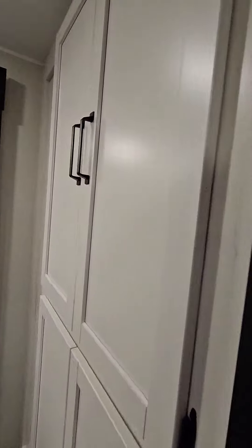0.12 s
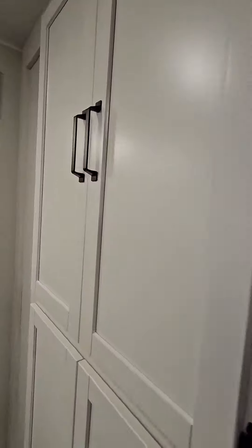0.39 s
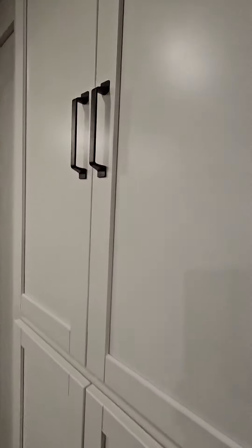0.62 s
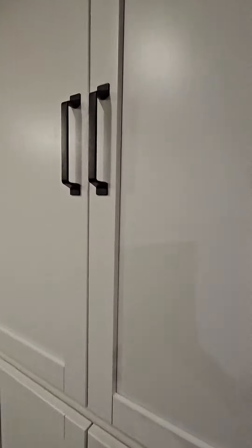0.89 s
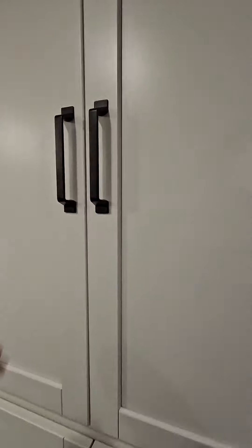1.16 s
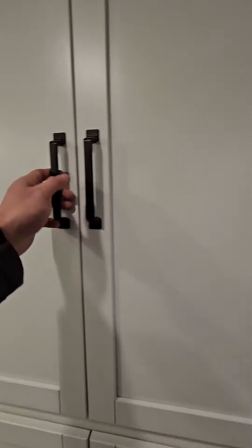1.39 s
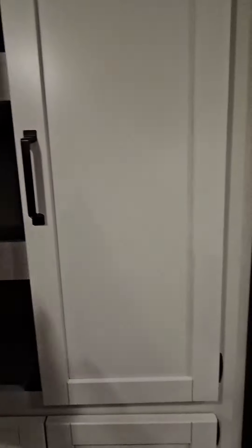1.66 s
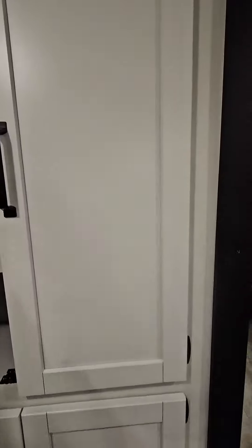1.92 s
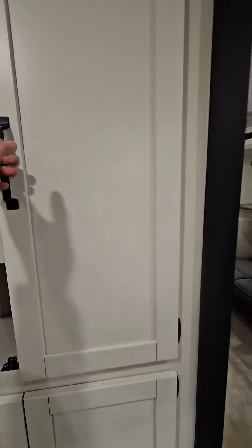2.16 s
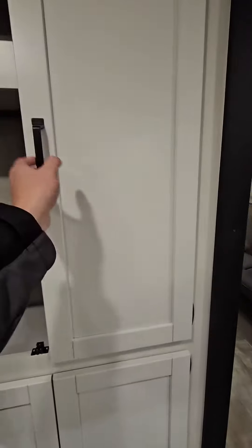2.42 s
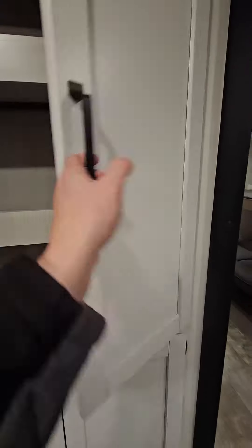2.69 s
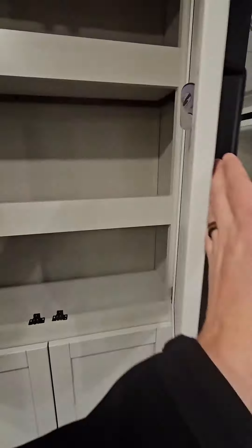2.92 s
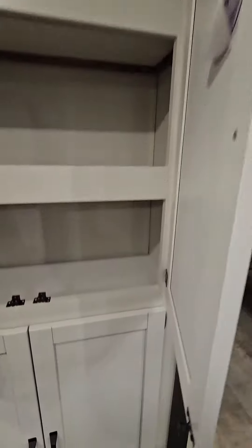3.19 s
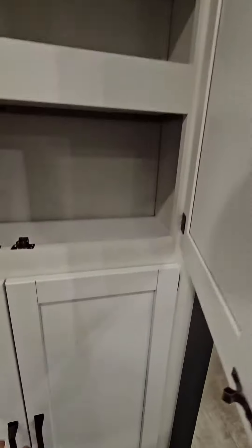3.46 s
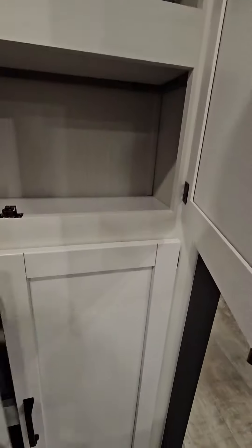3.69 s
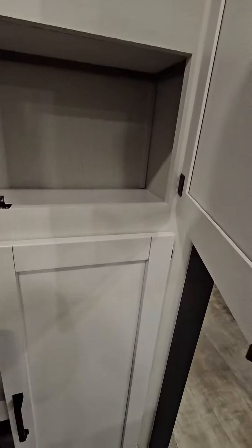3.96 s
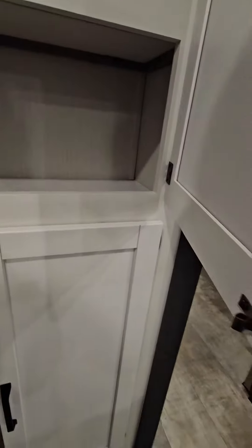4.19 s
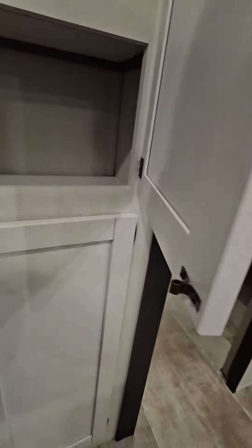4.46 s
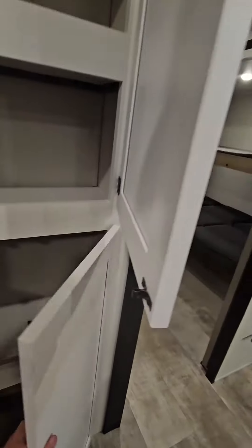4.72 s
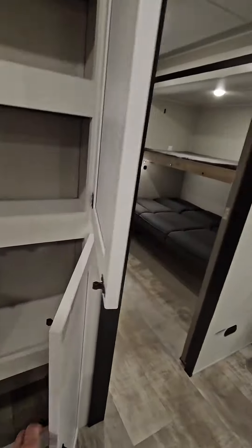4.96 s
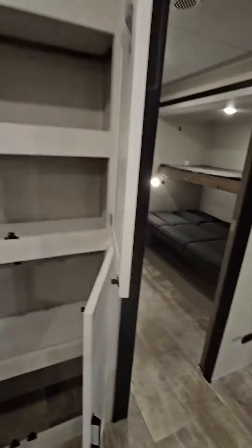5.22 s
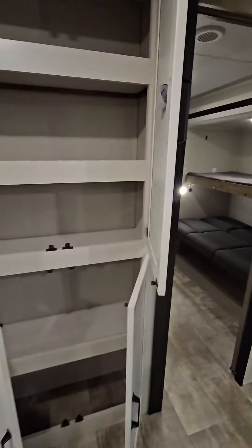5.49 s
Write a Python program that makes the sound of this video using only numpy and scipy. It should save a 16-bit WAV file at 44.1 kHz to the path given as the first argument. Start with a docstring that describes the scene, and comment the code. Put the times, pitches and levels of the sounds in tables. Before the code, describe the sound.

Cupboard doors are yanked off stiff catches one after another in a small trailer, with sharp wooden clacks, deep knocks, rattling hinges and sleeve rustle.

```python
"""Cupboard doors pulled open in a trailer

Four light wooden doors are pulled off spring catches: filtered noise clacks, decaying sines ring the steel.
Door wood knocks and booms through resonances; hinges flap in runs of roughly 22 taps a second, and buzz.
Padded thumps and dull thuds are low decaying tones; a tick, narrow tones, a panel's hum and scuffs join in.
A sleeve rustles as flickering noise over steady room air; short noise tails give the small room."""
import sys
import numpy as np
from scipy import signal
from scipy.fft import rfft, irfft, next_fast_len
from scipy.io import wavfile
from scipy.ndimage import uniform_filter1d, map_coordinates

SR = 44100
rng = np.random.default_rng(int(sys.argv[2]) if len(sys.argv) > 2 else 0)


def elevation(decibels):
    """Turn decibel levels (scalar or array-like) into linear amplitude ratios."""
    levels = np.asarray(decibels, float)
    return 10 ** (levels / 20)


def wav_record(signal):
    """Record a signal, one row per channel, as 16-bit PCM in the file named by sys.argv[1]."""
    frames = np.transpose(np.atleast_2d(signal))
    bounded = np.clip(frames, -1, 1)
    # unit amplitude maps onto the largest positive 16-bit level
    quanta = np.round(bounded * 32767).astype(np.int16)
    wavfile.write(sys.argv[1], SR, quanta)


N = 247383
T = np.arange(N) / SR

# All dB levels in the tables are nominal: mixing gains follow.
# Sleeve strokes. Each row: loudest moment in seconds, level in dB, rise and fall in seconds per 10 dB.
STROKES = [(0.3, -59, 0.31, 0.35), (0.6, -57, 0.21, 0.35), (0.93, -52, 0.047, 0.079),
           (1.091, -45.5, 0.026, 0.23), (1.3, -47, 0.2, 0.41), (2.2, -48.5, 0.076, 0.056),
           (2.43, -48, 0.1, 0.24), (3.1, -46.5, 0.042, 0.2), (3.48, -50, 0.66, 0.23),
           (4.35, -55.5, 0.3, 0.68), (4.8, -54, 0.031, 0.18), (5.091, -47.5, 0.073, 0.12),
           (5.25, -56.5, 0.043, 0.068), (5.39, -45.5, 0.098, 0.11), (5.6, -56, 0.14, 0.066)]
# Cloth hiss spectrum. Each row: frequency in Hz, relative density in dB per Hz.
CLOTH_SPECTRUM = [(350, 0.5), (600, -2.5), (1160, -2.5), (1580, -3), (2050, 0), (3410, -1.5), (6800, -2.5),
                  (7480, 0), (10000, -11), (11800, -1.5), (15100, -8), (16200, -12.5)]
# Quiet room air spectrum. Each row: frequency in Hz, relative density in dB per Hz.
AIR_SPECTRUM = [(150, -21), (250, -8.5), (313, -2), (398, -13.5), (693, -11.5), (935, -12.5), (9000, -30),
                (11700, -34), (19800, -120)]
# Likeness of noise at the two ports. Each row: frequency in Hz, correlation from 0 to 1.
PORT_LIKENESS = [(60, 0.053), (240, 0.78), (950, 0), (3770, 0.05), (15000, -0.0)]
# Panel shaking per door. Each row: release in seconds, jolt in dB, swing in dB, swing fade in dB per second,
# caught in seconds.
PANEL_SHAKE = [(1.57, -12, -21.5, 16.5, 2.3), (2.65, -14, -15, 78, 3.02), (3.72, -22.5, -13.5, 34.5, 4.36),
               (4.53, -9, -42, 71, 4.7)]
# Carcass shaking per door. Columns as for the panels.
CARCASS_SHAKE = [(1.57, -17, -21, 37, 2.6), (2.65, -13, -27.5, 24, 3.8), (3.72, -30, -17.5, 40, 4.12),
                 (4.53, -22, -27, 48, 4.76)]
# Carcass and floor modes. Each row: frequency in Hz, width in Hz, level in dB.
CABINET_MODES = [(35.8, 11.4, 1), (70, 20.4, -1.5)]
# Door wood modes. Each row: frequency in Hz, width in Hz, level in dB.
PANEL_MODES = [(109, 33, 4.5), (163, 29.2, 5.5), (215, 17.7, 1), (275, 24, 0), (350.3, 42.4, -3.5),
               (447, 34.3, -4), (518, 14.3, -10.5), (598, 120, -16.5), (818, 140, -21)]
# Soft dull thuds, probably feet on the floor. Each row: loudest moment in seconds, peak in dB.
STEPS = [(0.099, -36.5), (0.274, -34.5), (0.619, -37.5), (0.783, -36), (3.254, -35.5), (4.911, -34),
         (5.007, -34), (5.164, -34), (5.335, -34), (5.492, -38)]
# Catch and hinge contacts. Each row: start in seconds, clack in dB, loudest ring in Hz,
# treble over clack in dB, steel ring over clack in dB.
CONTACTS = [(0.545, -52.5, 2350, 5, 2), (1.536, -37, 2400, -8, -3), (1.5501, -14, 440, -11, -8),
            (1.5669, -13.5, 431, -10, -0.5), (1.599, -32, 447, -29.5, -18), (1.625, -23, 2300, -20, -13),
            (1.6813, -18, 2350, -25, -10), (1.7115, -23.5, 1300, -17, -1), (1.7574, -29.5, 1300, -17, -3),
            (2.193, -34, 830, -25, 2), (2.598, -35, 1244, -13, -7), (2.6177, -19, 3300, -2.5, -10),
            (2.6324, -12.5, 3000, -10.5, -5.5), (2.6854, -16.5, 460, -18, -20),
            (2.7057, -19.5, 2280, -6, -0.5), (2.7787, -26, 431, -18, 1), (2.8852, -43, 2400, -27, 0),
            (3.6417, -37, 479, -34, 7), (3.6897, -24.5, 431, -14, -19), (3.7077, -14.5, 479, -9.5, -30),
            (3.7219, -16, 465, -16, 7), (3.7495, -16.5, 500, -22, 6), (3.7796, -18.5, 625, -19, -17),
            (4.4815, -17.5, 506, -10, -22), (4.4993, -19, 487, -15.5, 3), (4.5222, -9.5, 500, -15.5, -0.5),
            (4.5444, -23, 431, -33, 4), (4.5994, -30, 433, -27, -6), (4.64, -39.5, 3270, -29, -4)]
# Tap runs of flapping doors. Each row: first and last tap in seconds, first and last level in dB,
# loudest ring in Hz.
FLAPS = [(1.8012, 1.888, -29.5, -36, 1080), (1.9445, 1.9844, -38.5, -39.5, 790),
         (2.0267, 2.0727, -33, -31, 800), (2.1157, 2.166, -34, -38, 795), (3.8187, 4.0344, -22, -39.5, 480),
         (4.0057, 4.047, -32, -37, 430), (4.076, 4.333, -41, -50.5, 1350)]
# Steel modes of catch, hinge and handle. Each row: frequency in Hz, level in dB, t60 in seconds.
CATCH_MODES = [(500, -3, 0.077), (788, -10, 0.085), (1280, 4, 0.0095), (2240, 3, 0.042), (2970, 0.5, 0.063),
               (3450, 3, 0.029), (7100, 3, 0.026)]
# Clack spectrum. Each row: frequency in Hz, relative density in dB per Hz.
CLACK_SPECTRUM = [(350, -3), (600, 3), (927, -2), (1290, -1), (1920, -3), (2990, -5), (5000, -12.5),
                  (6500, -14.5), (11000, -120)]
# Spectrum of the clack's treble. Each row: frequency in Hz, relative density in dB per Hz.
SIZZLE_SPECTRUM = [(2940, -24), (5000, -16), (6920, -13), (7750, -4.5), (10400, -17), (11400, -7),
                   (12700, -17), (15200, -11.5), (16200, -58)]
# Room decay. Each row: frequency in Hz, t60 in seconds.
ROOM_T60 = [(100, 0.28), (500, 0.24), (2000, 0.27), (6000, 0.35), (14000, 0.17)]
# Fingernail on the handle. One row: start in seconds, level in dB, pitch in Hz, t60 in seconds.
TICK = (1.2988, -26, 1320, 0.007)
# Padded blows of hand and door. Each row: start in seconds, level in dB, pitch in Hz,
# knock over thump in dB, knock in Hz.
THUMPS = [(1.386, -27, 78, 9, 275), (1.42, -27, 70, 2, 215), (1.451, -17.5, 50.3, -13, 230),
          (1.552, -10, 90.4, 5.5, 233), (1.598, -5.5, 54.6, 0.5, 275), (1.69, -16, 74, 2.5, 141),
          (1.808, -16, 44.3, -20, 165), (2.209, -18.5, 56, -1, 137), (2.469, -33, 39.4, 5, 155),
          (2.514, -21.5, 58, -5.5, 160), (2.577, -28.5, 105, 3.5, 166), (2.631, -11, 101, -9, 164),
          (2.689, -12, 87.4, -11, 146), (3.591, -33, 110, 2, 199), (3.646, -22.5, 100, -3, 143),
          (3.697, -11.5, 97, 8.5, 215), (3.749, -9, 76, 1, 192), (3.8, -10, 71.3, -2, 159),
          (3.848, -7, 65.6, -3, 153), (4.394, -29.5, 86.4, 8.5, 250), (4.511, -20.5, 40, 11.5, 297),
          (4.58, -19, 40.8, -17, 151), (4.931, -38, 59.5, 6, 350), (5.028, -37.5, 73, 1.5, 353)]
# Narrow rough tones of door wood and steel, during the flapping and around other knocks.
# Each row: first and last moment in seconds, frequency in Hz, width in Hz, first and last level in dB.
SINGING = [(1.968, 2.166, 790, 70, -49, -50), (2.19, 2.25, 885, 80, -45, -58),
           (2.197, 2.248, 1370, 70, -57, -61), (2.173, 2.27, 448, 58, -41.5, -55),
           (3.948, 4.27, 373, 50.7, -36.5, -49.5), (3.978, 4.357, 498, 50.4, -44.5, -54.5),
           (4.05, 4.334, 1310, 80, -59, -63), (4.405, 4.447, 177, 59, -32, -36),
           (4.493, 4.58, 480, 80, -27.5, -35)]
# Hum of a loose panel. Each row: time in seconds, central pitch in Hz, relative level in dB.
HUM = [(3.99, 165, -33), (4.1, 179, -34.5), (4.15, 185, -37.5), (4.39, 191, -47)]
# Short dull scuffs. Each row: start in seconds, length in seconds, level in dB.
SCUFFS = [(4.928, 0.063, -47.5), (5.023, 0.055, -45.5)]
# Scuff spectrum. Each row: frequency in Hz, relative density in dB per Hz.
SCUFF_SPECTRUM = [(150, -30), (260, -2), (500, 1), (800, -4.5), (1000, -20), (2000, -60)]

SNAP_DB_PER_S, JOLT_DB_PER_S, CAUGHT_DB_PER_S = 412, 151, 321  # rise into release, its fall, extra fall once held
PULL_DB, PULL_DB_PER_S = -16, 74  # strain relative to the jolt, its growth before release
PANEL_REST_DB, CARCASS_REST_DB, ARM_DB = -57.5, -46, 0  # at rest; arm's stir of the panels over sleeve level
STEP_HZ, STEP_SWELL_S, STEP_FADE_S = 68, 0.017, 0.021
FLAP_RATE_HZ, FLAP_SCATTER_DB = 22.8, 1.2  # rate sets a whole number of taps per run
FLAP_TREBLE_DB, FLAP_RING_DB = -20.5, 3.5  # over the clack
LEFT_LAG_RAD, LEFT_LAG_HZ = 0.22, 160  # left port's lag in the deep bass, halved at this frequency
RING_IN_ROOM_DB = -9


def unit(x):
    """Scaled to rms 1."""
    return x / np.sqrt(np.mean(x ** 2) + 1e-20)


def along(points, hz):
    """(Hz, value) points interpolated on a log axis."""
    f, v = np.transpose(points)
    return np.interp(np.log(hz + 1), np.log(f + 1), v)


def curves(rows):
    """One value per sample for each column after the time."""
    s, *cols = np.transpose(rows)
    return [np.interp(T, s, c) for c in cols]


def wobble(rate_hz):
    """Smooth random curve with rate_hz knots a second."""
    knots = rng.standard_normal(int(N * rate_hz / SR) + 4)
    return map_coordinates(knots, [T * rate_hz])


def filtered(x, response):
    """x times a complex response of frequency."""
    m = next_fast_len(N + SR // 2)
    return irfft(rfft(x, m) * response(np.fft.rfftfreq(m, 1 / SR)), m)[..., :N]


def highpass(x, corner_hz):
    """Zero-phase loss of the lows."""
    return filtered(x, lambda hz: hz ** 2 / (hz ** 2 + corner_hz ** 2))


def resonant(x, modes):
    """x through parallel causal resonances of alternating sign."""
    def response(f):
        return sum((-1) ** k * elevation(db) * 1j * f * width / (hz * hz - f * f + 1j * f * width)
                   for k, (hz, width, db) in enumerate(modes))
    return filtered(x, response)


def pair(spectrum):
    """Coloured noise of rms 1 at two ports; mid and side shares set the likeness at each frequency."""
    def response(hz):
        turn = np.arccos(np.clip(along(PORT_LIKENESS, hz), -1, 1)) / 2
        return elevation(along(spectrum, hz)) * [np.cos(turn), np.sin(turn)]
    mid, side = filtered(rng.standard_normal((2, N)), response)
    return unit(np.array([mid + side, mid - side]))


def summed(levels_db):
    """Levels added as powers."""
    return 10 * np.log10(np.sum(elevation(levels_db) ** 2, axis=0))


def tent(s, db, rise, fall):
    """Level that climbs to db at time s and sinks again, slopes in dB a second."""
    return np.maximum(db - np.where(T < s, rise * (s - T), fall * (T - s)), -200)


def sleeve_db():
    """Level of the sleeve's strokes."""
    return summed([tent(s, db, 10 / rise, 10 / fall) for s, db, rise, fall in STROKES])


def rustle(sleeve):
    """Cloth hiss with small flickers over the steady air of the room."""
    cloth_db = sleeve + 3.5 + 2.38 * wobble(24.996)
    return elevation(cloth_db) * pair(CLOTH_SPECTRUM) + elevation(-57.5) * pair(AIR_SPECTRUM)


def shaking_db(doors, rest_db):
    """Strain grows under the pull, the release jolts, the swing fades until hand or hinge catches the door."""
    parts = [rest_db + 0 * T]
    for s, jolt_db, swing_db, fade, caught in doors:
        jolt = tent(s, jolt_db, SNAP_DB_PER_S, JOLT_DB_PER_S)
        pull = tent(s, jolt_db + PULL_DB, PULL_DB_PER_S, SNAP_DB_PER_S)
        swing = tent(s, swing_db, SNAP_DB_PER_S, fade) - CAUGHT_DB_PER_S * np.maximum(T - caught, 0)
        parts += [jolt, pull, swing]
    return summed(parts)


def panel_db(sleeve):
    """How hard the panels shake: the doors, and a little the moving arm."""
    return summed([shaking_db(PANEL_SHAKE, PANEL_REST_DB), sleeve + ARM_DB])


def shake(shaking):
    """Uneven forces, as noise through wood modes, keep carcass and panels sounding."""
    boom_db = shaking_db(CARCASS_SHAKE, CARCASS_REST_DB)
    carcass = resonant(rng.standard_normal(N), CABINET_MODES)
    boom = unit(resonant(carcass, [(56, 760, 0)]))
    force = rng.standard_normal(N) * elevation(0.87 * wobble(30))
    panels = unit(resonant(force, PANEL_MODES))
    return elevation(boom_db - 0.5) * boom + elevation(shaking - 8.0) * panels


def chatter(shaking):
    """Loose hinges buzz finely and dully, following the panels' shaking."""
    buzz = filtered(pair(CLACK_SPECTRUM), lambda hz: 1 / (1 + (hz / 3600) ** 4))
    return elevation(shaking - 18.0 + 3.2 * wobble(90)) * buzz


def steps():
    """Each thud swells and fades smoothly around a low, slightly scattered pitch."""
    sound = np.zeros(N)
    for (s, db), d in zip(STEPS, rng.standard_normal(len(STEPS))):
        t = T - s
        swell = np.exp(-.5 * (t / np.where(t < 0, STEP_SWELL_S, STEP_FADE_S)) ** 2)
        sound += elevation(db) * swell * np.cos(2 * np.pi * STEP_HZ * (1 + 0.057 * d) * t)
    return sound


def flaps():
    """Contact rows for the tap runs: even spacing, scattered level gliding from first to last."""
    rows = []
    for first, last, first_db, last_db, ring_hz in FLAPS:
        taps = round((last - first) * FLAP_RATE_HZ) + 1
        levels = np.linspace(first_db, last_db, taps) + FLAP_SCATTER_DB * rng.standard_normal(taps)
        times = np.linspace(first, last, taps)
        rows += [(s, db, ring_hz, FLAP_TREBLE_DB, FLAP_RING_DB) for s, db in zip(times, levels)]
    return rows


def knocked(blows, t60, soft_hz):
    """Door wood under contacts that judder for a moment, so that its modes start out of step."""
    decay_s = t60 / np.log(1000)
    judder = filtered(blows, lambda hz: 1 / (1 + 2j * np.pi * hz * decay_s)) * SR * decay_s
    force = filtered(judder * rng.standard_normal(N), lambda hz: 1 / (1 + 1j * hz / soft_hz))
    return resonant(force, PANEL_MODES)


def contacts():
    """Each contact snaps, scrapes briefly, rings the steel catch at new strengths and knocks the door wood."""
    t = np.arange(SR // 6) / SR
    low, high = np.zeros((2, N + SR))
    ring = np.zeros((2, N + SR))
    blows = np.zeros(N)
    rows = CONTACTS + flaps()
    luck = rng.standard_normal((len(rows), 2 * len(CATCH_MODES)))
    snap_and_scrape = elevation(-60 * t / 0.071) + elevation(-60 * t / 0.0032)
    fade = (1 - np.exp(-t / 0.00061)) * snap_and_scrape
    treble_fade = fade ** 0.83 * (1 - np.exp(-t / 0.00081))  # builds up a little later
    for (s, db, ring_hz, treble_db, ring_db), dice in zip(rows, luck):
        at = slice(round(s * SR), round(s * SR) + len(t))
        low[at] += elevation(db - 3) * fade
        high[at] += elevation(db + treble_db - 2.0) * treble_fade
        for ear in range(2):  # the ports hear the small steel parts at unrelated strengths
            for (hz, level, t60), d in zip(CATCH_MODES, dice[ear::2]):
                # where the blow lands decides which mode leads; high modes go with the treble
                lead_db = treble_db if hz > 5000 else -14 * abs(np.log2(hz / ring_hz))
                mode_db = level + lead_db + 2 * d - 60 * t / t60
                tone = np.sin(2 * np.pi * hz * (1 + 0.034 * d) * t)
                ring[ear, at] += elevation(db + ring_db) * elevation(mode_db) * tone
        blows[at.start] = elevation(db + 18.5)
    knock = knocked(blows, t60=0.049, soft_hz=1400)
    clack = low[:N] * pair(CLACK_SPECTRUM) + high[:N] * pair(SIZZLE_SPECTRUM)
    return clack + knock, ring[:, :N]


def trailer(x):
    """The small room answers each port with its own tail; each frequency dies at its own speed."""
    hz, t, z = signal.stft(rng.standard_normal((2, SR // 2)), SR, nperseg=256)
    decay = elevation(-60 * t / along(ROOM_T60, hz)[:, None])
    tail = signal.istft(z * decay, SR, nperseg=256)[1]
    late = np.pad(x, ((0, 0), (200, 0)))  # delay in samples
    return signal.fftconvolve(late, tail / np.linalg.norm(tail[0]), axes=1)[:, :N]


def tick():
    """One dry, very short ring: a decaying sine."""
    s, db, hz, t60 = TICK
    t = np.maximum(T - s, 0)
    return elevation(db - 60 * t / t60) * np.sin(2 * np.pi * hz * t)


def thumps():
    """A padded push swings the carcass at one low pitch; its harder part rings the wood near one mode."""
    sound, t = np.zeros(N + SR), np.arange(SR // 3) / SR
    luck = rng.standard_normal((len(THUMPS), len(PANEL_MODES), 2))
    boom_fade = elevation(0.5 - 60 * t / 0.22) * (1 - np.exp(-t / 0.0067))
    for (s, db, boom_hz, knock_db, knock_hz), dice in zip(THUMPS, luck):
        boom = boom_fade * np.sin(2 * np.pi * boom_hz * t)
        wood = np.zeros(len(t))
        for (hz, width, level), (size, phase) in zip(PANEL_MODES, dice):
            mode_db = level - 9.7 * abs(np.log2(hz / knock_hz)) + 2 * size
            wood += elevation(mode_db) * np.exp(-np.pi * width * t) * np.sin(2 * np.pi * hz * t + np.pi * phase)
        knock = elevation(knock_db - 3.5) * (1 - np.exp(-t / 0.0053)) * wood
        sound[round(s * SR):][:len(t)] += elevation(db) * (boom + knock)
    return sound[:N]


def singing():
    """Narrow rough tones: noise through one steep mode each, gliding in level."""
    sound = np.zeros(N)
    for first, last, hz, width, first_db, last_db in SINGING:
        gate = np.interp(T, [first - .015, first, last, last + 0.016], [0, 1, 1, 0])
        tone = filtered(rng.standard_normal(N), lambda f: 1 / (1 + (2 * (f - hz) / width) ** 2))
        sound += gate * elevation(np.interp(T, [first, last], [first_db, last_db])) * unit(tone)
    return sound


def hum():
    """The third door's panel sings while it swings free: a wavering sine, renewed 23 times a second."""
    hz, db = curves(HUM)
    first, last = HUM[0][0], HUM[-1][0]
    swing = np.interp(T, [first - .04, first, last, last + 0.019], [0, 1, 1, 0])
    flap = uniform_filter1d(elevation(-9 * (23 * (T - 4.046) % 1)), size=300)
    level = elevation(db + 11.5 + 1.3 * wobble(40))
    cycles = np.cumsum(hz * (1 + 0.016 * wobble(40))) / SR
    return swing * flap * level * np.sin(2 * np.pi * cycles)


def scuffs():
    """Dull noise that starts at once, sinks by about half and stops."""
    held = np.zeros(N)
    for s, length, db in SCUFFS:
        end = s + length
        held += elevation(db) * np.interp(T, [s, s + 0.0031, end, end + 0.014], [0, 0.93, 0.41, 0])
    return held * unit(filtered(rng.standard_normal(N), lambda hz: elevation(along(SCUFF_SPECTRUM, hz))))


def scene():
    """Contacts with their room, the low body sounds and the sleeve, at two ports."""
    clack, ring = contacts()
    near = clack + ring + tick() + scuffs() + singing()
    sleeve = sleeve_db()
    shaking = panel_db(sleeve)
    low = thumps() + steps() + shake(shaking) + hum()

    def port_lag(hz):
        lag = LEFT_LAG_RAD / (1 + (hz / LEFT_LAG_HZ) ** 2)
        return np.exp(np.outer([-.5j, .5j], lag))

    ports = filtered(low, lambda hz: port_lag(hz) * hz ** 2 / (hz ** 2 + 22 ** 2))
    spread = elevation(-3.0) * highpass(trailer(np.array([low, low])), 300)  # spares the deep bass
    room = elevation(-3.5) * highpass(trailer(clack + elevation(RING_IN_ROOM_DB) * ring), 350)
    near = near * elevation(np.array([[.3], [-.3]]))
    ports = ports * elevation(np.array([[.4], [-.4]]))
    return near + room + ports + spread + chatter(shaking) + rustle(sleeve)


def band_limit(x):
    """A steep low-pass at the top of the band."""
    return signal.sosfilt(signal.butter(12, 16970, fs=SR, output="sos"), x)


def record(dry):
    """The input stage rounds off the highest peaks."""
    rounded = dry / (1 + dry ** 6) ** (1 / 6)
    return band_limit(rounded)


dry = scene()
out = record(dry)
wav_record(out)
```